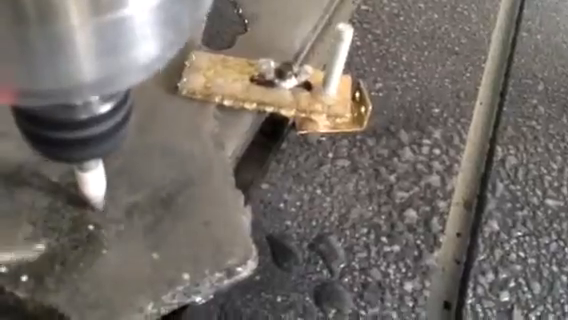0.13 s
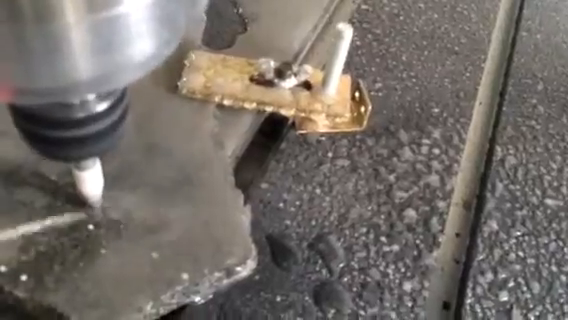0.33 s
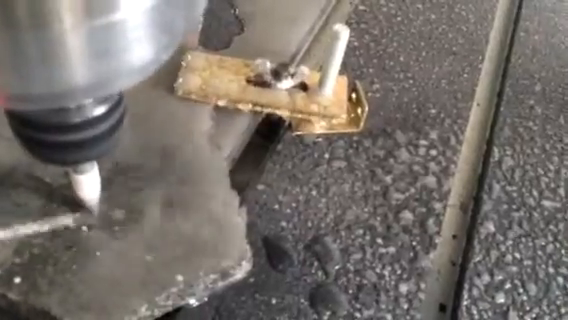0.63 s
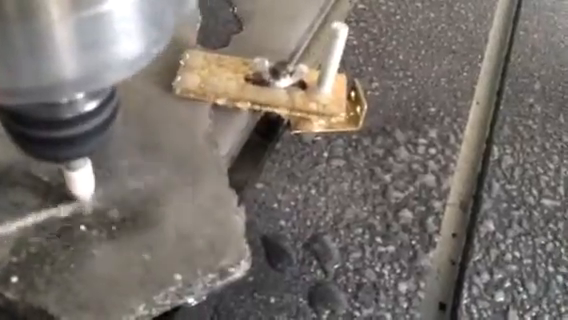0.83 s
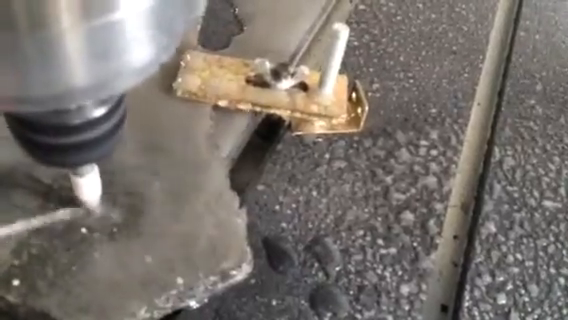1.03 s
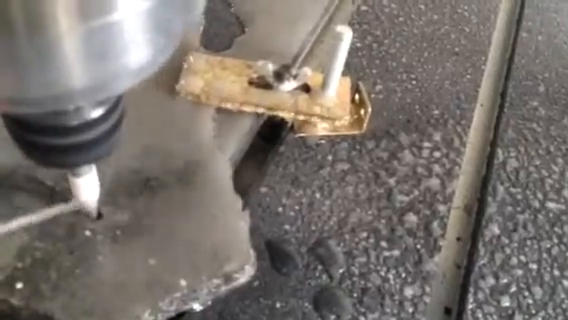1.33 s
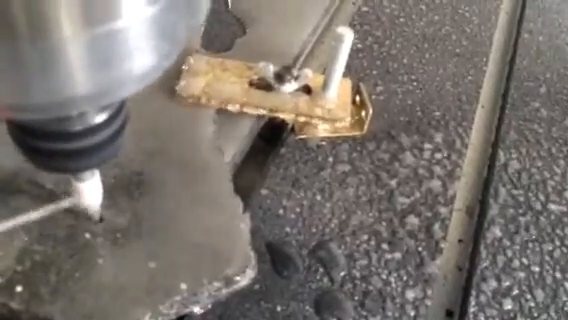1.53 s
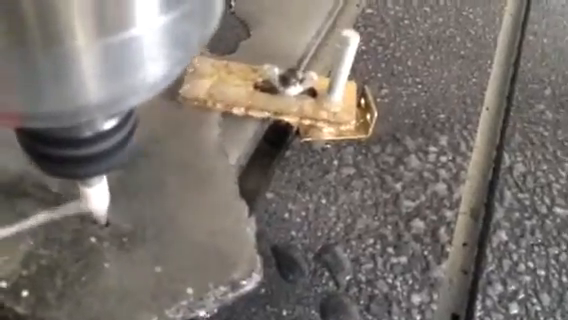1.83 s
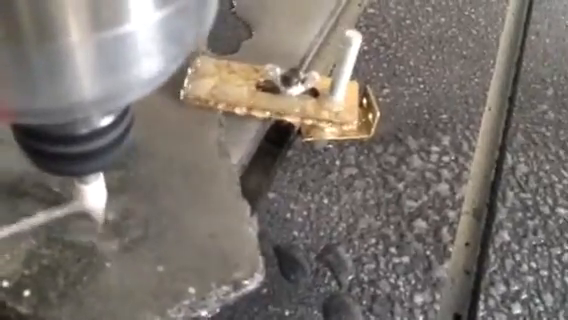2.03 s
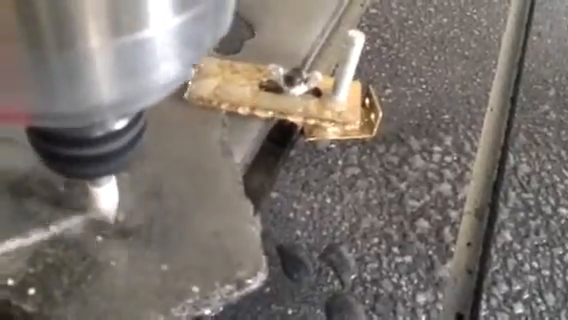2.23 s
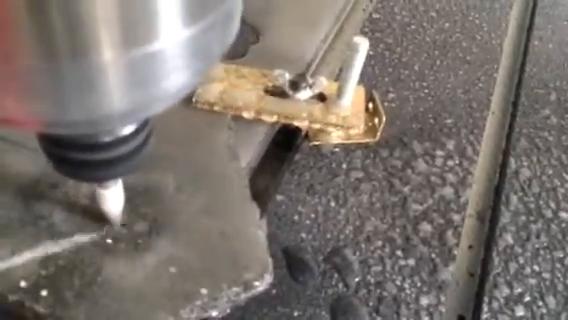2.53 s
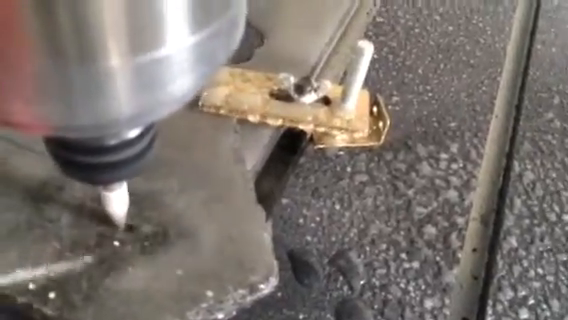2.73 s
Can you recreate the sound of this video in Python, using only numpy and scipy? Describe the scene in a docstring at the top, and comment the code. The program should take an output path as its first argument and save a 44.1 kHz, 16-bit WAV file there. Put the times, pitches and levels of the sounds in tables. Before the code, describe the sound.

A router bit grinds wet stone in shrill, rasping strokes, a little under two a second. Its spindle whines throughout and hums louder with each deep cut, over faint water hiss and low machine rumble in a workshop.

```python
"""A workshop: a router spindle whines at 400 turns a second while its bit engraves wet stone.
The bit strikes once per turn. Each stroke bites in, drags lightly, digs deep with a shrill rasp,
then only skims the groove. The frame hums under load and the bit throws fine slurry.
Cooling water hisses and the machine rumbles underneath."""
import sys
import numpy as np
from scipy import signal
from scipy.fft import rfft, irfft, next_fast_len
from scipy.io import wavfile
from scipy.ndimage import uniform_filter1d, map_coordinates

SR = 44100
rng = np.random.default_rng(int(sys.argv[2]) if len(sys.argv) > 2 else 0)


def wrap_up_sound(samples):
    """Save the sound to the file named by the first command line argument, as 16-bit audio."""
    columns = np.atleast_2d(samples).T
    # keep every value between -1 and 1, then stretch to whole-number steps
    tamed = np.clip(columns, -1, 1)
    steps = np.round(tamed * 32767).astype(np.int16)
    wavfile.write(sys.argv[1], SR, steps)


N = 127449
T = np.arange(N) / SR

# Noise spectra. Each row: frequency in Hz, relative density in dB.
WATER_AND_IDLE_SPECTRUM = [(60, -29.5), (200, -9.5), (260, -12.5), (330, 2), (550, -12), (1000, -10.5),
                           (1600, -12), (3000, -8.5), (5500, -15), (10000, -28.5), (15000, -46)]
RUMBLE_SPECTRUM = [(25, -39), (45, -12.5), (76, 0), (100, -0.5), (130, -4), (200, -8.5), (300, -21.5),
                   (1000, -30)]
SPRAY_SPECTRUM = [(200, -9.5), (600, 0), (1200, -6.5), (2500, -1.5), (4300, 3), (5200, -0.5), (7500, -2),
                  (10500, -2), (12500, -3.5), (15000, -17)]
# Bed rumble over time. Each row: time in seconds, relative level in dB.
RUMBLE_LEVELS = [(0.0, -40.5), (1.01, -41), (1.05, -38.5), (1.33, -42.5), (1.74, -39.5), (1.92, -42),
                 (2.24, -38.5), (2.61, -45.5), (2.86, -40.5), (2.89, -45)]
# Motor whine. Each row: multiple of the spindle rate, level in dB.
WHINE_HARMONICS = [(2, -34.5), (3, -51), (4, -44.5), (5, -45.5), (6, -52.5), (7, -42.5), (8, -43),
                   (9, -47.5), (10, -45.5), (11, -43), (12, -48), (13, -58), (14, -51.5)]
# Bit entering, dragging, digging deep. Each row: start in seconds, end in seconds, level in dB.
BITE_CONTACTS = [(0.289, 0.347, -20), (0.83, 0.905, -19), (1.415, 1.477, -21), (2.031, 2.114, -19),
                 (2.7, 2.77, -18.5)]
DRAG_CONTACTS = [(.275, .51, -27), (.825, 1.08, -27), (1.405, 1.69, -24.5), (2.04, 2.30, -24.5),
                 (2.69, 2.95, -23.5)]
DIG_CONTACTS = [(-.02, .124, -14), (.502, .648, -15.5), (1.064, 1.210, -15), (1.664, 1.816, -14.5),
                (2.280, 2.460, -15)]
# Rasp filter per kind of contact. Each row: frequency in Hz, relative gain in dB.
BITE_RESPONSE = [(300, -17), (1200, -26.5), (2300, -14.5), (2800, 6), (3200, 7.5), (3600, 7.5), (4000, 7.5),
                 (4400, -6.5), (5100, -6.5), (6300, -13), (7500, -5), (9000, -10), (11000, -18),
                 (13000, -15), (15000, -14)]
DRAG_RESPONSE = [(300, 30), (1200, -2), (2300, 4), (2750, 7.5), (3150, 16), (3600, 10), (4350, 14),
                 (5100, 2), (6300, -14.5), (7600, 1), (9000, -11), (11200, -6), (13000, -17), (15000, -26)]
DIG_RESPONSE = [(300, 14), (1300, -21.5), (2000, -12.5), (2400, -16.5), (3100, -9.5), (3600, -4.5),
                (4350, 3), (4750, 1), (5200, -12.5), (5900, -6.5), (6500, -20.5), (7600, -13.5),
                (10200, -13.5), (11600, -18.5), (12600, -30.5), (15000, -31.5)]
SKIM_RESPONSE = [(300, -58), (1500, -9), (2400, -7), (2800, 12.5), (3200, 8), (4300, 1.5), (4900, -16),
                 (6500, -0.5), (7900, 1), (9000, -3.5), (11200, -4.5), (13000, -10), (15000, -4)]

SPINDLE_HZ, DRIVE_HZ = 399.5, 6999
CHATTER_FROM_HZ, OVERTONES_FROM_HZ = 2270, 6670


def from_db(db):
    """Decibels to gain."""
    return 10 ** (np.asarray(db) / 20)


def unit_rms(x):
    """Scale to unit power."""
    return x / np.sqrt(np.mean(x ** 2) + 1e-20)


def drift(rate_hz):
    """Slow random motion, unit RMS."""
    hop, run_in = 40, 2000
    pole = np.exp(-2 * np.pi * rate_hz * hop / SR)
    noise = rng.standard_normal(N // hop + run_in + 2)
    slow = signal.lfilter([1], [1, -2 * pole, pole * pole], noise)[run_in:]
    return np.interp(np.arange(N) / hop, np.arange(len(slow)), unit_rms(slow))


def coloured(x, points):
    """Minimum-phase filter through (Hz, dB) points; unit RMS out."""
    size = 4096
    hz, db = np.transpose(points)
    grid_hz = np.maximum(np.arange(size // 2 + 1) * SR / size, 1)
    gain = from_db(np.interp(np.log(grid_hz), np.log(hz), db))
    cepstrum = irfft(np.log(gain))
    cepstrum[1:size // 2] *= 2
    cepstrum[size // 2 + 1:] = 0
    impulse = irfft(np.exp(rfft(cepstrum)))
    return unit_rms(signal.fftconvolve(x, impulse)[:N])


def lagged(x, lag_s):
    """One-pole follower."""
    pole = np.exp(-1 / (lag_s * SR))
    return signal.lfilter([1 - pole], [1, -pole], x, zi=[pole * x[0]])[0]


def water_and_idle(level_db=-35):
    """Steady hiss of cooling water and the idling machine."""
    return from_db(level_db) * coloured(rng.standard_normal(N), WATER_AND_IDLE_SPECTRUM)


def bed_rumble(gain_db=2):
    """Low noise of the machine bed, rising and falling."""
    level_db = gain_db + np.interp(T, *np.transpose(RUMBLE_LEVELS))
    return from_db(level_db) * coloured(rng.standard_normal(N), RUMBLE_SPECTRUM)


def reflections(x, t60_s=0.42, level_db=-14.5):
    """Short diffuse tail from the machine bed and the walls."""
    t = T[:SR // 2]
    tail = rng.standard_normal(len(t)) * from_db(-60 * t / t60_s) * (t > .002)
    return from_db(level_db) * signal.fftconvolve(x, tail / np.sqrt(np.sum(tail ** 2)))[:N]


def motor_whine(phase, swell_db=-30, delay_s=0.021, width_s=0.017):
    """Fluttering harmonics; the second is steadiest and swells as each bite settles."""
    settling = sum(np.exp(-.5 * ((T - end - delay_s) / width_s) ** 2) for _, end, _ in BITE_CONTACTS)
    whine = np.zeros(N)
    for harmonic, db in WHINE_HARMONICS:
        flutter_db = 2.8 if harmonic == 2 else 5
        gain = from_db(db + flutter_db * drift(17.7))
        if harmonic == 2:
            gain += from_db(swell_db) * settling
        whine += gain * np.sin(harmonic * phase + rng.uniform(0, 2 * np.pi))
    return np.sqrt(2) * whine


def frame_hum(phase, drag, dig, dig_db=-22, drag_db=-34.5, skim_db=-39.5, hold_s=0.015):
    """Hum at the turn rate. Load lifts it and advances its phase, so pitch sags as the bit lets go."""
    held = np.maximum(dig, np.interp(T - hold_s, T, dig)) / dig.max()
    swell = from_db(dig_db) * held + from_db(drag_db) * drag / drag.max() + from_db(skim_db)
    swell = lagged(swell, lag_s=0.0074)
    load = np.log(swell / swell.min()) / np.log(swell.max() / swell.min())
    lead_turns = .45 * lagged(load, lag_s=0.01)
    flutter = from_db(1.33 * drift(19.4))
    return np.sqrt(2) * swell * flutter * np.sin(phase + 2 * np.pi * lead_turns)


def spindle(drag, dig, wander_hz=0.57, drive_db=-46.5):
    """Whine and hum on one shaft phase, plus the drive's steady tone."""
    phase = 2 * np.pi * np.cumsum(SPINDLE_HZ + wander_hz * drift(12.9)) / SR
    drive = np.sqrt(2) * from_db(drive_db) * np.sin(2 * np.pi * DRIVE_HZ * T)
    return motor_whine(phase) + frame_hum(phase, drag, dig) + drive


def slurry_spray(bite, drag, dig, skim, loudest_db=-26.5):
    """Hiss of slurry thrown off the bit; follows cutting effort."""
    effort = np.sqrt(.3 * bite ** 2 + drag ** 2 + dig ** 2 + skim ** 2)
    return from_db(loudest_db) * effort / effort.max() * coloured(rng.standard_normal(N), SPRAY_SPECTRUM)


def pressure(contacts, attack_s, release_s=0.0054):
    """Each contact rises, holds to its end and dies away."""
    envelope = np.zeros(N)
    for start_s, end_s, db in contacts:
        rise = np.clip((T - start_s) / attack_s, 0, 1)
        envelope += from_db(db) * rise * np.exp(-np.maximum(T - end_s, 0) / release_s)
    return envelope


def grit_force(turns, memory_turns, between_db, width_turns, knock_db=-6):
    """Once a turn the bit knocks and grinds over nearly the same grit."""
    cells, run_in_turns = 110, 60
    carry = np.exp(-1 / memory_turns)
    fresh = rng.standard_normal((1300, cells))  # one row per turn
    grit = signal.lfilter([1, 1], [1, -carry], fresh, axis=0)[run_in_turns:]
    angle_turns = np.arange(cells) / cells - .5
    contact = from_db(between_db) + np.exp(-.5 * (angle_turns / width_turns) ** 2)
    force = unit_rms(grit * contact)
    force[:, cells // 2] += from_db(knock_db) * np.sqrt(cells)
    return map_coordinates(force.ravel(), [(turns + 1) * cells], order=3)


def chatter(force, response, step_hz, locked_db, flutter_db, wander_hz=8.22):
    """The tool rasps a step under each spindle harmonic, beating against a part locked to the spindle."""
    highpass = signal.butter(4, 950, "high", fs=SR, output="sos")
    rasp = coloured(signal.sosfilt(highpass, force), response)
    rasp /= np.sqrt(uniform_filter1d(rasp ** 2, size=440) + 1e-6)  # the feed keeps pressure even
    rasp = signal.hilbert(rasp, next_fast_len(N))[:N]
    low_mid = signal.sosfiltfilt(signal.butter(6, OVERTONES_FROM_HZ, fs=SR, output="sos"), rasp)
    low = signal.sosfiltfilt(signal.butter(4, CHATTER_FROM_HZ, fs=SR, output="sos"), rasp)
    step_down = np.exp(-2j * np.pi * np.cumsum(step_hz + wander_hz * drift(15.2)) / SR)
    # Lows stay put, mids drop one step, overtones two.
    shifted = low + (low_mid - low) * step_down + (rasp - low_mid) * step_down ** 2
    beating = np.real(shifted + from_db(locked_db) * rasp)
    return unit_rms(beating) * from_db(flutter_db * drift(50))


def cutting(bite, drag, dig, skim_db=-32, wander_hz=0.87):
    """Bit on stone: spray and four kinds of contact. The skim never stops."""
    turns = np.cumsum(SPINDLE_HZ + wander_hz * drift(31.8)) / SR
    skim = from_db(skim_db)
    cut = slurry_spray(bite, drag, dig, skim)
    force = grit_force(turns, memory_turns=4.7, between_db=-7, width_turns=0.13)
    cut += bite * chatter(force, BITE_RESPONSE, step_hz=31, locked_db=-25, flutter_db=1.1)
    force = grit_force(turns, memory_turns=4.4, between_db=-3.5, width_turns=0.12)
    cut += drag * chatter(force, DRAG_RESPONSE, step_hz=70, locked_db=-11, flutter_db=1.5)
    force = grit_force(turns, memory_turns=3.8, between_db=-5, width_turns=0.13)
    cut += dig * chatter(force, DIG_RESPONSE, step_hz=37, locked_db=-24, flutter_db=0.5)
    force = grit_force(turns, memory_turns=1.5, between_db=-16, width_turns=0.11, knock_db=-0.5)
    cut += skim * chatter(force, SKIM_RESPONSE, step_hz=32, locked_db=-11.5, flutter_db=0.9)
    return cut


def scene():
    """Background, spindle and cut; mono."""
    bite = pressure(BITE_CONTACTS, attack_s=0.018)
    drag = pressure(DRAG_CONTACTS, attack_s=0.0105)
    dig = pressure(DIG_CONTACTS, attack_s=0.0317)
    cut = cutting(bite, drag, dig)
    return (water_and_idle() + bed_rumble() + reflections(cut) + spindle(drag, dig) + cut)[None]


def record(dry):
    """Steep low-pass."""
    cutoff_hz = 15350
    return signal.sosfilt(signal.ellip(12, .2, 80, cutoff_hz, fs=SR, output="sos"), dry)


dry = scene()
out = record(dry)
wrap_up_sound(out)
```